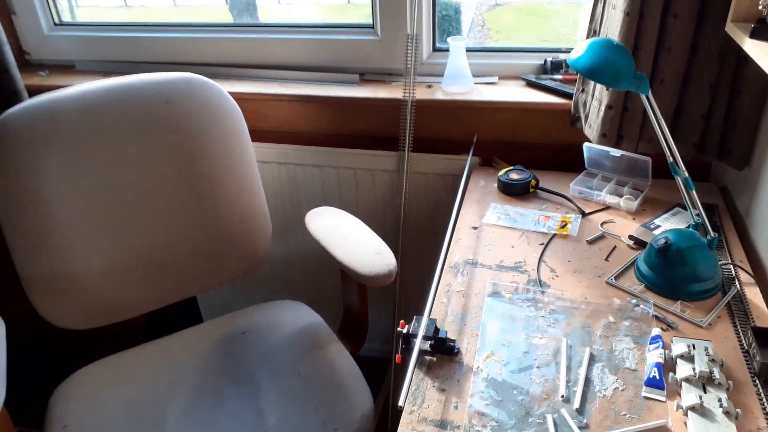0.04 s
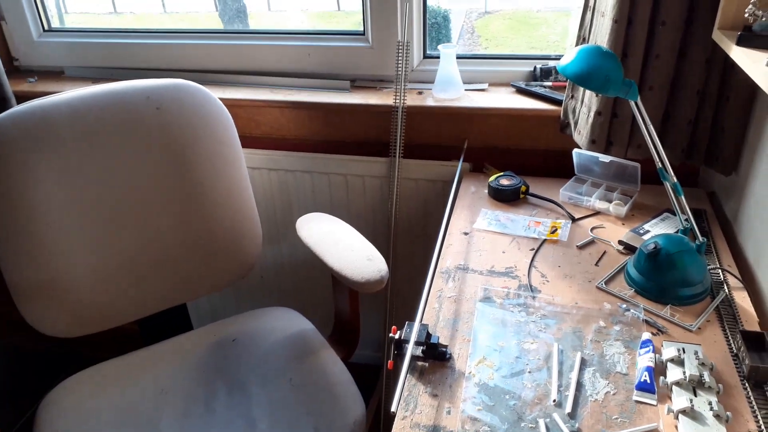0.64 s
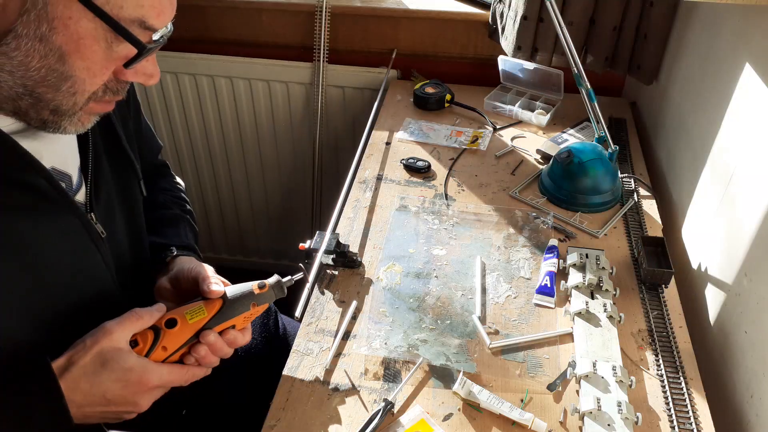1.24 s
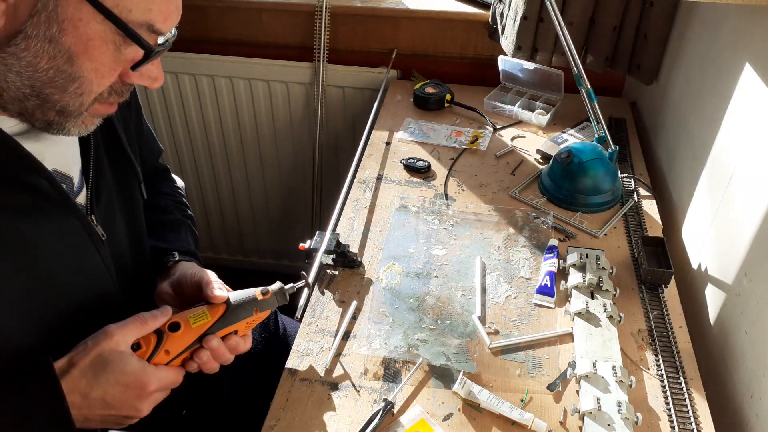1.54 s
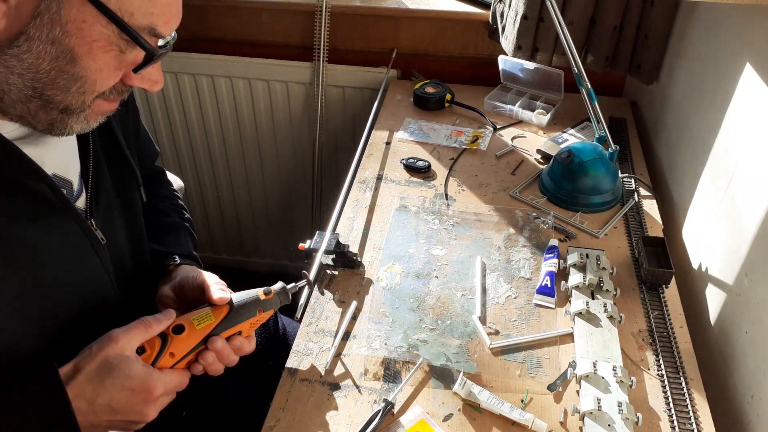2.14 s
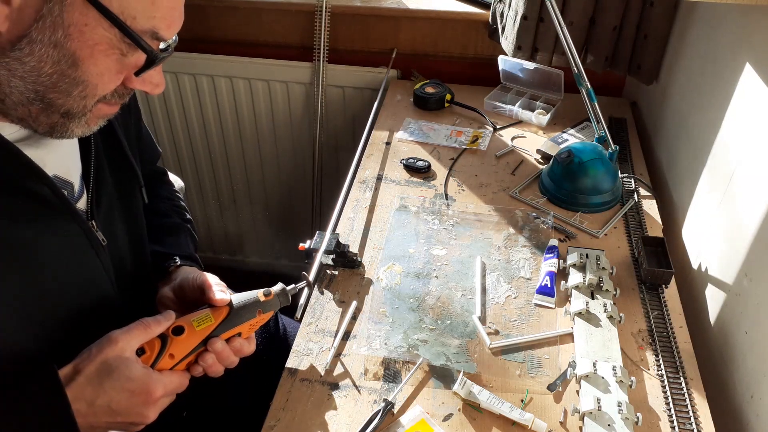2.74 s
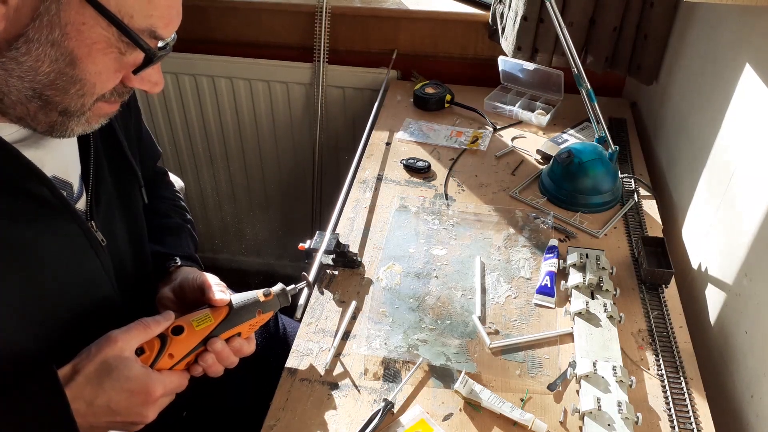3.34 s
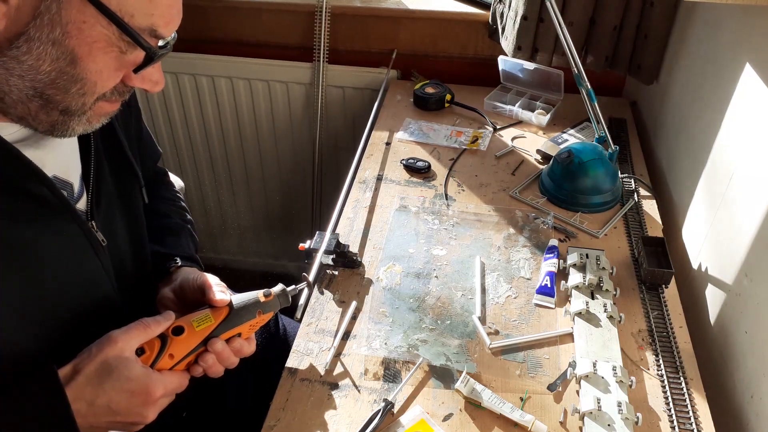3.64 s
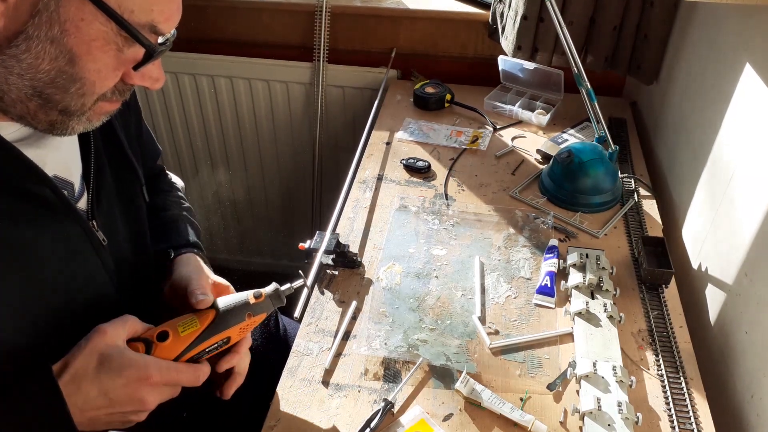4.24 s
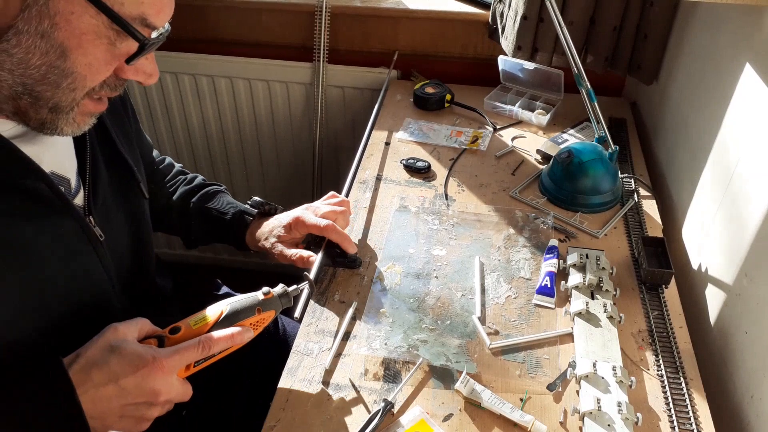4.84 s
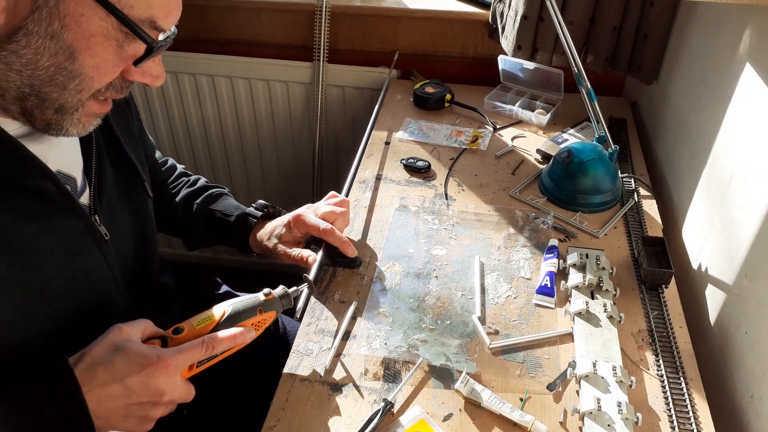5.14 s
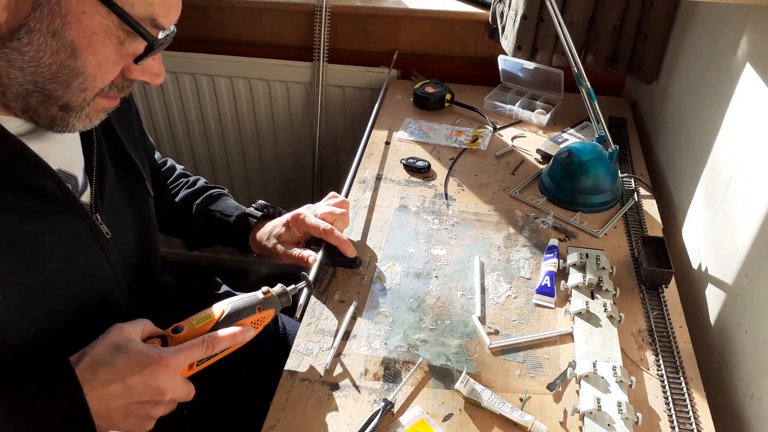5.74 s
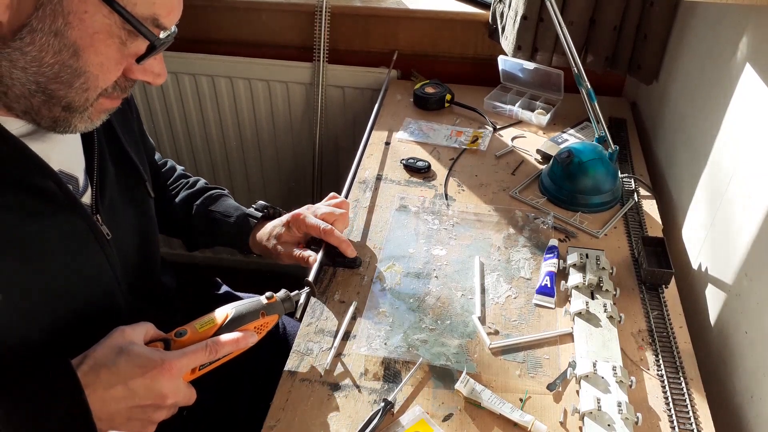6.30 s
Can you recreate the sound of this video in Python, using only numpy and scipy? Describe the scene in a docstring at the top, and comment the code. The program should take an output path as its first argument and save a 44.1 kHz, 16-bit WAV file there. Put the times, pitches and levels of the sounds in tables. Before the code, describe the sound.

A handheld rotary tool whines up and grinds into a thin metal rod, jams with a thud, recovers and cuts again.

```python
"""First come soft handling rustles, then a switch snaps and a handheld rotary tool whines up to speed.
Its wheel cuts a thin metal rod clamped to a workbench: it rattles as it skips, snarls once seated in
its groove, drags the motor down and jams. The rod rings until a hand steadies it. The motor recovers,
and the wheel chatters and seats again. Fan and brushes make the whine and hiss; the wheel knocks and
scrapes the rod once a turn. The room is small and the stereo microphone is close."""
import sys
import numpy as np
from scipy import signal
from scipy.fft import rfft, irfft, next_fast_len
from scipy.io import wavfile
from scipy.ndimage import uniform_filter1d, map_coordinates

SR = 44100
rng = np.random.default_rng(int(sys.argv[2]) if len(sys.argv) > 2 else 0)


def waveform_to_disk(signal):
    """Save audio, clipped to [-1, 1], as 16-bit WAV at the path in sys.argv[1]."""
    frames = np.transpose(np.atleast_2d(signal))
    scaled = np.clip(frames, -1, 1) * 32767
    samples = np.round(scaled).astype(np.int16)
    wavfile.write(sys.argv[1], SR, samples)


N = 285327
T = np.arange(N) / SR  # time of each sample
HZ = np.fft.rfftfreq(4096, 1 / SR)  # pitches at which filters are drawn

# Levels are relative. A fade is the time to drop 60 dB. A tone table shapes a sound from bass to treble.
# tone of the quiet room: pitch_hz, level_db
ROOM_TONE = [(40, -35), (180, 12), (380, -4), (16000, -28)]
# handling noises: peak_s, level_db, rise_s, fade_s, top_hz
RUSTLES = [(0.0, -58, 0.011, 0.83, 14000), (0.16, -55.5, 0.026, 0.5, 15000),
           (0.297, -48, 0.0045, 0.21, 11600), (0.562, -53.5, 0.093, 0.026, 7740),
           (0.683, -49.5, 0.013, 0.026, 11000)]
# tone of the handling: pitch_hz, level_db
RUSTLE_TONE = [(40, -13), (220, -8), (570, -5.5), (6000, -16), (16000, -17.5)]
# dull blows on the bench: start_s, level_db, fade_s
THUDS = [(0.659, -42.5, 0.035), (1.66, -40, 0.56), (3.853, -24, 0.45), (4.72, -53, 0.45)]
# tone of the bench: pitch_hz, level_db
BENCH_TONE = [(25, -49), (65, -14), (100, -10), (150, 9.5), (300, 1.5), (700, -8), (3000, -16)]
# tone of the fan's air: pitch_hz, level_db
AIR_TONE = [(80, -33), (250, -22.5), (480, -15), (800, -7), (1300, -5), (1750, -12), (2200, -7.5),
            (4000, -11), (7500, -5.5), (9000, -17.5), (11600, -9.5), (15800, -14)]
# whine of the fan blades and the motor's contacts: cycles_per_turn, level_db
WHINE = [(8, -20), (16, -12), (18, -11.5), (32, -18), (36, -24), (48, -26)]
# resonances (favoured pitches) of the tool's case: pitch_hz, half_width_hz, boost_db
CASE_PEAKS = [(2300, 90, 3.5), (8240, 160, 19)]
# the motor's level dips after the jam, returns, and sinks in the last cut: time_s, level_db
MOTOR_DIP = [(3.8, 5), (4.1, -8.5), (5.05, -3), (5.45, 4.5), (6.3, -1.5)]
# resonances shaken by the unbalanced wheel: pitch_hz, width_hz, free_db, seated_db, right_lag_rad
HUM_PEAKS = [(292, 19, -14, -56, 0.44), (330.2, 10.5, -23, -22, -0.017), (376.4, 24.5, -8, -34, 0.032),
             (447, 55, -3, -57, 2.2)]
# swaying of rod and bench after the jam: pitch_hz, level_db, fade_s
SWAY = [(56.6, -30, 0.16), (151.6, -37, 0.44), (224, -48.5, 2.6)]
# resonances of rod, clamp and wheel: pitch_hz, width_hz, free_boost_db, held_boost_db
ROD_PEAKS = [(1276, 167, 10.5, 12.5), (1974, 150, 12.5, 9.5), (2366, 170, 7.5, 1.5), (4752, 400, 10.5, 5.5),
             (5580, 750, 11.5, 13), (6256, 190, 9, 15.5), (10950, 1620, 10, 11), (15660, 1150, 13, 10)]
# the wheel's edge catches: start_s, level_db, fade_s
BITES = [(1.631, -11, 0.23), (2.126, -12, 0.18), (2.173, -20, 0.56), (2.33, -21, 0.12), (2.662, -5, 0.021),
         (3.85, -15, 0.072), (3.897, -17, 0.18), (5.398, -23, 0.092), (5.575, -16.5, 0.07),
         (5.790, -10.5, 0.044), (5.825, -19.5, 0.14)]
# ring of the free rod after a catch: pitch_hz, boost_db
RING_PEAKS = [(2370, 10), (3117, 8.4), (4860, 22.7), (6330, 9.1), (7585, 10), (8220, 11.7), (15400, 26.3)]
# squeals in the groove: peak_s, length_s, cycles_per_turn, level_db
SQUEALS = [(2.811, 0.12, 5, -32), (3.34, 0.83, 2, -41), (3.75, 0.19, 6, -32.5), (3.73, 0.2, 15, -27),
           (6.3, 0.14, 8, -43.5), (6.44, 0.26, 6, -41.5)]
# tone of the scraping grit: pitch_hz, level_db
GRIT_TONE = [(60, -39), (380, 2.5), (520, -29.5), (1000, -22), (3200, 3), (6000, -2), (7200, 0), (9300, -5),
             (12000, -0.5), (14000, -6), (15600, -4), (16500, -62)]
# tone of the knocked rod: pitch_hz, skipping_db, seated_db
KNOCK_TONE = [(98, -87.5, -33), (576, 2.5, 5.5), (666, -6, 0), (778, 0.5, -8.5), (1000, -5, -6.5),
              (1330, 2, -15.5), (1530, -5, 0.5), (2440, 6, 1.5), (6100, -29.5, -12)]
# the wheel brushes the rod and lifts off: start_s, length_s, drag_hz, grind_db, knock_db
TOUCHES = [(1.637, 0.12, 35, -36, -26.5), (2.125, 0.2, 38, -22.5, -30.5), (5.397, 0.7, 0, -37.5, -45.5)]
# the hand presses the wheel in until it jams: time_s, drag_hz, seated_0_to_1, grind_db, knock_db
FIRST_CUT = [(2.33, 71.7, 0.46, -17, -31.5), (2.6, 93.5, 0.51, -21.5, -30.5), (2.8, 84, 0.6, -18.5, -30.5),
             (3.02, 226.5, 0.68, -18, -23.5), (3.17, 139.3, 0.73, -20, -24), (3.5, 140.9, 0.74, -21.5, -27),
             (3.72, 188.4, 0.82, -18.5, -25.5), (3.83, 352.1, 0.56, -17, -37.5),
             (3.87, 971.3, .07, -18.5, -34), (3.97, 266, 0.097, -26.5, -37.5)]
# the hand presses it in again: time_s, drag_hz, seated_0_to_1, grind_db, knock_db
LAST_CUT = [(5.54, -0.5, 0.2, -26, -38), (5.7, 47.5, 0.13, -23.5, -34.5), (6.08, 153.5, 0.11, -23, -30),
            (6.2, 171.5, 0.98, -19.5, -39.5), (6.47, 179.5, 1, -20, -41.5)]
# landings of the skipping wheel in the last cut: time_s
SKIPS = [5.545, 5.585, 5.634, 5.672, 5.715, 5.76, 5.797, 5.832, 5.872, 5.918, 5.967, 6.02, 6.07, 6.125]

SEATED, GRIND, KNOCK = 2, 3, 4  # column numbers in the cut tables
SWITCH_ON_S, JAM_S, STEADIED_S = 0.893, 3.855, 4.72
FREE_HZ = 464.2  # turns a second with nothing touching the wheel


def amp(db):
    """Turns decibels into a number to multiply by."""
    return 10 ** (np.asarray(db) / 20)


def unit(x):
    """Scales a signal to an average power of 1."""
    return x / np.sqrt(np.mean(x ** 2) + 1e-20)


def curve(rows, column=1, outside=None):
    """One column of a table, joined by straight lines in time."""
    rows = np.asarray(rows)
    return np.interp(T, rows[:, 0], rows[:, column], outside, outside)


def tone(points, column=1):
    """Joins the points of a tone table into a filter shape, in dB."""
    points = np.asarray(points)
    return np.interp(np.log(HZ + 1), np.log(points[:, 0]), points[:, column])


def boost(peaks):
    """A filter shape in dB with one bump for each resonance."""
    return sum(db / (1 + (2 * (HZ - hz) / width) ** 2) for hz, width, db in peaks)


def colour(x, shape_db):
    """Filters a sound to the given shape; white noise keeps its power."""
    cepstrum = irfft(np.log(amp(shape_db)))
    half = len(cepstrum) // 2
    # folding this in half makes the filter ring after a sound, never before it
    cepstrum[1:half] *= 2
    cepstrum[half + 1:] = 0
    taps = irfft(np.exp(rfft(cepstrum)))[:half]
    return signal.oaconvolve(x, taps / np.linalg.norm(taps))[:N]


def wander(hz, step=32):
    """A smooth random wobble, with up to about hz changes a second."""
    count = next_fast_len(N // step + 2)
    rates = np.fft.rfftfreq(count, step / SR)
    slow = unit(irfft(rfft(rng.standard_normal(count)) * np.exp(-(rates / hz) ** 2), count))
    return np.interp(T, np.arange(count) * step / SR, slow)


def blows(rows):
    """Loudness over time of hits that start suddenly and die away."""
    power = np.zeros(N)
    for start, db, fade in rows:
        age = np.maximum(T - start, 0)
        power += (amp(db - 60 * age / fade) * np.minimum(age / .002, 1)) ** 2
    return np.sqrt(power)


def drag():
    """Turns a second that the rod would take off the shaft if the pressure were held."""
    touches = sum(hz * (T > start) * (T < start + length) for start, length, hz, *_ in TOUCHES)
    return np.maximum(touches + curve(FIRST_CUT, outside=0) + curve(LAST_CUT, outside=0), 0)


def pressing_db(lightest_hz=70, firm_hz=233, tenfold_db=15.5):
    """How hard the wheel bears on the rod: more drag means more pressure."""
    return tenfold_db * np.log10(np.maximum(drag(), lightest_hz) / firm_hz)


def cut_level(column, lift_off_db=-17, fade_s=0.21):
    """Loudness of grinding or knocking: a touch fades as it lifts, a cut holds and then dies away."""
    gain = np.zeros(N)
    for touch in TOUCHES:
        progress = (T - touch[0]) / touch[1]
        during = (progress > 0) & (progress < 1)
        gain[during] += amp(touch[column] + lift_off_db * progress[during] ** 2)
    for cut in (FIRST_CUT, LAST_CUT):
        release_db = -60 * np.maximum(T - cut[-1][0], 0) / fade_s
        gain += (T > cut[0][0]) * amp(curve(cut, column) + release_db)
    return uniform_filter1d(gain, size=180)


def shaft_speed(kick_hz=39.92, inertia_s=0.589):
    """Turns a second: the motor jerks into motion, then its weight smooths every change of speed."""
    on = T > SWITCH_ON_S
    keep = np.exp(-1 / (inertia_s * SR))
    kick = on * kick_hz * np.exp(-np.maximum(T - SWITCH_ON_S, 0) / inertia_s)
    return signal.lfilter([1 - keep], [1, -keep], on * FREE_HZ - drag()) + kick


def motor_level(hz, base_db=-37.5, full_hz=303):
    """The motor gets louder with speed, up to full_hz, and follows MOTOR_DIP."""
    return amp(base_db + curve(MOTOR_DIP)) * np.clip(hz / full_hz, 0, 1) ** 1.68


def room(x, early_db=4, early_fade_s=0.058, tail_db=-4, tail_fade_s=0.24):
    """The direct sound, quick echoes off the bench, and a short tail."""
    t = np.arange(SR // 3) / SR
    response = np.zeros(len(t))
    for db, fade in ((early_db, early_fade_s), (tail_db, tail_fade_s)):
        echoes = rng.choice([-1, 1], len(t)) * (rng.random(len(t)) < .1) * amp(-60 * t / fade)
        response += amp(db) * echoes / np.linalg.norm(echoes)
    response[0] = 1
    # even out the echoes so they favour neither bass nor treble
    gain = rfft(response, 2 * len(t))
    response = irfft(gain / np.sqrt(uniform_filter1d(abs(gain) ** 2, size=150)))[:len(t)]
    return signal.oaconvolve(x, response / np.linalg.norm(response))[:N]


def microphone_side(sources):
    """Each source has its own echoes, and they change when the hand moves to the rod."""
    moved = T > (JAM_S + STEADIED_S) / 2
    return sum(room(x * ~moved) + room(x * moved) for x in sources)


def background(room_db=-75):
    """Handling rustles swell and die over the quiet of the room."""
    sound = amp(room_db) * colour(rng.standard_normal(N), tone(ROOM_TONE))
    for peak, db, rise, fade, top_hz in RUSTLES:
        swell = np.exp(np.minimum(T - peak, 0) / rise) * amp(db - 60 * np.maximum(T - peak, 0) / fade)
        dull_db = -10 * np.log10(1 + (HZ / top_hz) ** 8)
        sound += swell * colour(rng.standard_normal(N), tone(RUSTLE_TONE) + dull_db)
    return sound


def bench(hz, rumble_db=-14, motor_db=-29):
    """The bench rumbles with the motor, more as the wheel is pressed down, and thuds when knocked."""
    rumble = cut_level(KNOCK) * amp(rumble_db + pressing_db()) + amp(motor_db) * motor_level(hz)
    return colour(rng.standard_normal(N) * np.hypot(blows(THUDS), rumble), tone(BENCH_TONE))


def sway(stop_s=0.038):
    """The rod sways from the jam until the hand stops it."""
    free = np.clip((STEADIED_S - T) / stop_s, 0, 1)
    return free * sum(blows([(JAM_S, db, fade)]) * np.sin(2 * np.pi * hz * T) for hz, db, fade in SWAY)


def switch(spit_db=-26.5, fade_s=0.18, ring_hz=585, ring_db=-55, ring_s=0.76):
    """The motor's brushes (sliding contacts) spit as the power comes on, and the case sings briefly."""
    burst = rng.standard_normal(N) * blows([(SWITCH_ON_S, spit_db, fade_s)])
    spit = colour(burst, tone([(200, -20), (700, -10), (6000, 8.5), (15000, 8.0)]))
    progress = np.clip((T - SWITCH_ON_S) / ring_s, 0, 1)
    swell = np.sqrt(np.maximum(np.sin(np.pi * progress), 0))
    return spit + amp(ring_db) * swell * (1 + .5 * wander(46)) * np.sin(2 * np.pi * ring_hz * T)


def hum(turns, hz, seated, shake=0.54):
    """The unbalanced wheel hums in stereo, swelling at each resonance and shaking in the cut."""
    touching = uniform_filter1d(1.0 * (drag() > 0), size=900)
    free, in_groove = motor_level(hz) * (1 - touching), touching * seated
    sound = np.zeros((2, N))
    for peak_hz, width, free_db, seated_db, lag in HUM_PEAKS:
        push = amp(free_db) * free + amp(seated_db) * in_groove
        gain = push / (1 + (2 * (hz - peak_hz) / width) ** 2)
        sound += gain * np.sin(2 * np.pi * turns - np.array([[0], [lag]]))
    return np.sqrt(2) * sound * (1 + shake * in_groove * (1 - in_groove) * wander(21))


def motor(turns, hz, air_db=-1.5, rattle=0.41, rough_hz=12000, top_hz=13000):
    """Fan air and whine; each note of the whine swells as it passes a resonance of the case."""
    brushes = 1 + .35 * np.cos(2 * np.pi * 8 * turns)
    sound = amp(air_db) * colour(rng.standard_normal(N) * brushes, tone(AIR_TONE))
    slow_fuzz = rattle * (FREE_HZ / np.maximum(hz, FREE_HZ / 2)) ** 2
    for per_turn, db in WHINE:
        pitch = per_turn * hz
        case_db = sum(gain / (1 + ((pitch - peak) / width) ** 2) for peak, width, gain in CASE_PEAKS)
        # high notes are fuzzier and fainter
        fuzz = np.hypot(slow_fuzz, .5 * (pitch / rough_hz) ** 2)
        level = amp(db + case_db) / np.hypot(1, (pitch / top_hz) ** 2)
        note = np.sqrt(2) * np.sin(2 * np.pi * per_turn * turns + fuzz * wander(127))
        sound += level * (1 + rattle * wander(99)) * note
    return motor_level(hz) * sound


def held_rod_db():
    """The rod's resonances with a hand lying on it."""
    return boost((hz, width, held_db) for hz, width, _, held_db in ROD_PEAKS)


def through_rod(x, shape_db):
    """Colours a sound by the rod, free at first and then held."""
    free_db = boost(peak[:3] for peak in ROD_PEAKS)
    held = T >= STEADIED_S
    return colour(x * ~held, shape_db + free_db) + colour(x * held, shape_db + held_rod_db())


def chatter(slow_db, fast_db, start_s=2.33, stop_s=2.8, slow_hz=4.4, crest_s=2.36):
    """The springy rod bounces on the wheel: slow and even in the first cut, fast and uneven later."""
    slow = (T > start_s) * (T < stop_s) * np.cos(2 * np.pi * slow_hz * (T - crest_s))
    skip_count = np.interp(T, SKIPS, np.arange(len(SKIPS)))
    fast = (T > SKIPS[0]) * (T < SKIPS[-1]) * np.cos(2 * np.pi * skip_count)
    return amp(slow_db * slow + fast_db * fast)


def rod_shudder(turns, seated, db=-1, skip_hz=55):
    """A skipping wheel shakes the rod unevenly, a little slower than the shaft turns."""
    angle = 2 * np.pi * .9 * turns
    shake = wander(skip_hz) * np.cos(angle) + wander(skip_hz) * np.sin(angle)
    return amp(db) * cut_level(KNOCK) * chatter(slow_db=7, fast_db=-2) * (1 - seated) * shake


def squeals(turns, rough=0.37):
    """The wheel sings out in the groove at a multiple of its speed, so the pitch falls as it slows."""
    sound = np.zeros(N)
    for peak, length, per_turn, db in SQUEALS:
        swell = amp(db) * np.exp(-(2 * (T - peak) / length) ** 2) * (1 + rough * wander(60))
        sound += swell * np.sin(2 * np.pi * per_turn * turns + rough * wander(60))
    return np.sqrt(2) * sound


def landing(turns, seated, skip_db=2.0, slip_turns=0.069):
    """On each turn a skipping wheel lands harder or softer, earlier or later."""
    hard, late = rng.standard_normal((N // 64, 2))[turns.astype(int)].T
    force = unit(amp(skip_db * (1 - 0.83 * seated ** 2) * np.clip(hard, -2, 2)))
    from_landing = turns % 1 - .5 - slip_turns * (1 - seated) * late  # in turns
    return force, from_landing


def knocking(seated, force, from_landing, knock_db=-3, width_turns=0.083, lurch_db=2.5, bite_db=-18):
    """One knock a turn: a rattle while the wheel skips, a pitched snarl once it sits in its groove."""
    knocks = force * np.exp(-(from_landing / width_turns) ** 2)
    knocks -= knocks.mean()
    rattle, snarl = (unit(through_rod(knocks, tone(KNOCK_TONE, column))) for column in (1, 2))
    level = cut_level(KNOCK) * amp(knock_db + lurch_db * wander(38)) * chatter(slow_db=4.5, fast_db=5)
    level = np.hypot(level, amp(bite_db) * blows(BITES))
    return level * ((1 - seated) * rattle + seated * snarl)


def bites(grit, octave_db=-3, ring_width_hz=380, rasp_hz=4800, rasp_width_hz=1300, rasp_db=5.4):
    """The edge catches and tears: the free rod rings, but pinched in the jam or held it only rasps."""
    sound, age = np.zeros(N), T[:SR // 4]
    body_db = tone(GRIT_TONE) + octave_db * np.log2(np.maximum(HZ / 3500, 1))
    free_db = boost((hz, ring_width_hz, db) for hz, db in RING_PEAKS)
    held_db = boost([(rasp_hz, rasp_width_hz, rasp_db)]) + held_rod_db() / 2
    pinched_s = FIRST_CUT[-3][0]
    for start_s, db, fade in BITES:
        start = round(start_s * SR)
        burst = grit[start:start + len(age)] * amp(db - 60 * age / fade) * np.minimum(age / .0015, 1)
        burst = colour(burst, body_db + (held_db if start_s > pinched_s else free_db))
        sound[start:start + len(burst)] += burst
    return sound


def wheel_face(turns, wear_turns=55, grain_count=128):
    """The same grains pass the rod on every turn, and slowly wear into new ones."""
    keep = np.exp(-1 / wear_turns)
    grains = signal.lfilter([1], [1, -keep], rng.standard_normal((N // 64, grain_count)), axis=0)
    return unit(map_coordinates(grains.ravel(), [turns * grain_count], order=3, mode="nearest"))


def grinding(turns, seated, force, from_landing, grit_db=-2.5, lurch_db=1.32, sizzle_hz=8500):
    """The slightly off-centre wheel drags its grit across the rod once a turn."""
    contact = force * unit(np.exp(0.58 * (1 - .5 * seated) * np.cos(2 * np.pi * from_landing)))
    repeats = np.clip(0.27 + 0.58 * seated ** 3, 0, 1)  # a seated wheel scrapes more alike each turn
    grains = np.sqrt(repeats) * wheel_face(turns) + np.sqrt(1 - repeats) * rng.standard_normal(N)
    grit = contact * grains
    level = amp(grit_db + lurch_db * wander(30)) * cut_level(GRIND) * chatter(slow_db=0, fast_db=4)
    scrape = through_rod(grit * level, tone(GRIT_TONE))
    # the treble flickers; pressing and skipping bring it out
    sizzle = signal.sosfiltfilt(signal.butter(4, sizzle_hz, "high", fs=SR, output="sos"), scrape)
    sizzle_db = 0.14 * pressing_db() + 4 * (.5 - seated) + 3.5 * wander(35)
    return scrape + sizzle * (amp(sizzle_db) - 1) + bites(grit)


def scene(left_db=3.0, bass_spread=0.33, flutter=0.00304):
    """Tool and rod stand slightly left; the bass is more alike on both sides than the treble."""
    hz = shaft_speed()
    turns = np.cumsum(hz * (1 + flutter * wander(69.7))) / SR  # the shaft is never quite steady
    seated = np.clip(curve([*FIRST_CUT, *LAST_CUT], SEATED), 0, 1)  # 0 skipping, 1 in the groove
    force, from_landing = landing(turns, seated)
    tool = motor(turns, hz) + switch() + background()
    cutting = grinding(turns, seated, force, from_landing) + knocking(seated, force, from_landing)
    bass_middle, bass_side = (rod_shudder(turns, seated) + bench(hz) for _ in range(2))
    squeal = squeals(turns)
    left = amp(left_db) * (microphone_side([tool, cutting]) + squeal) + bass_spread * bass_side
    right = microphone_side([tool, cutting]) + squeal - bass_spread * bass_side
    return np.array([left, right]) + bass_middle + sway() + hum(turns, hz, seated)


def record(dry, top_hz=15850):
    """Rounds off the loudest peaks, then removes the highest treble."""
    low_pass = signal.firwin(1023, top_hz, window=("kaiser", 9), fs=SR)
    return signal.oaconvolve(np.tanh(dry), low_pass[None], "same")


dry = scene()
out = record(dry)
waveform_to_disk(out)
```